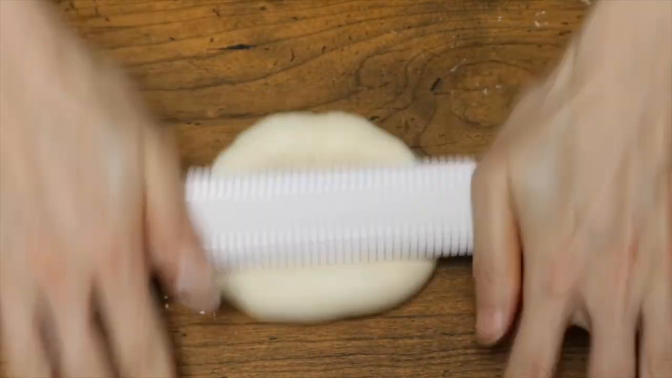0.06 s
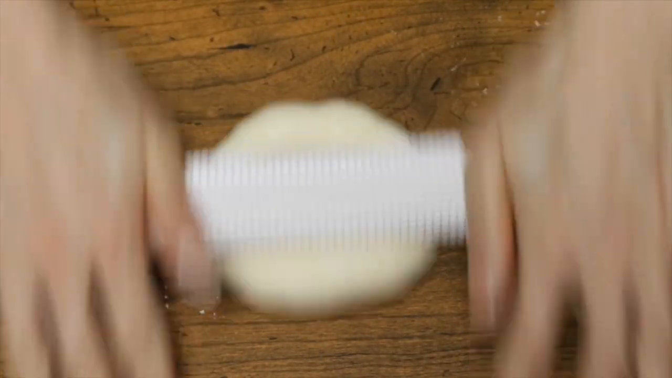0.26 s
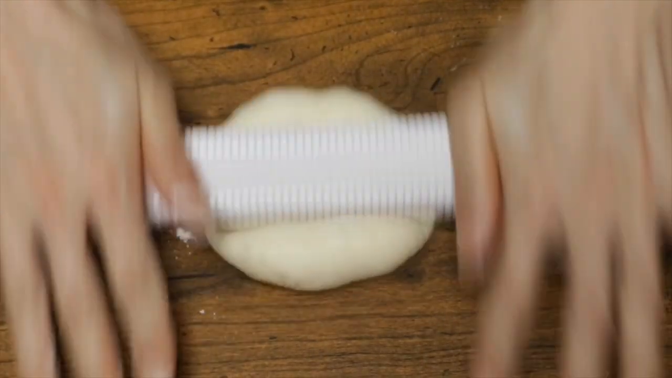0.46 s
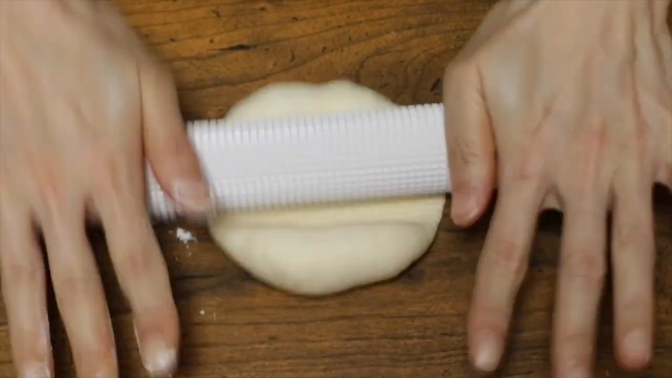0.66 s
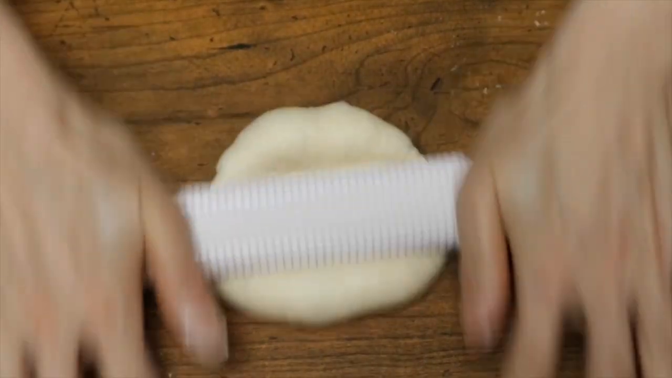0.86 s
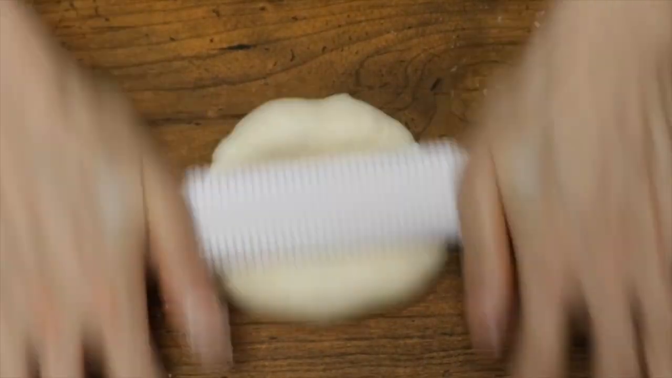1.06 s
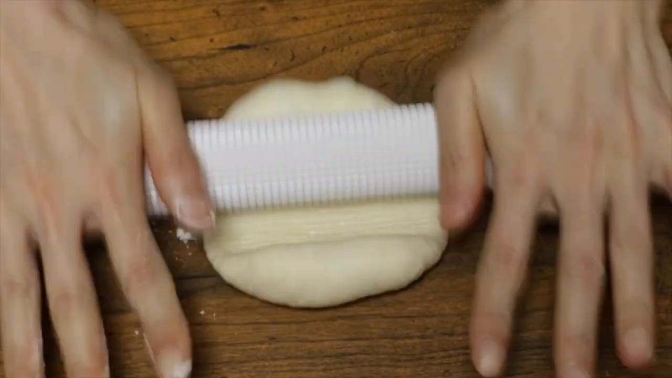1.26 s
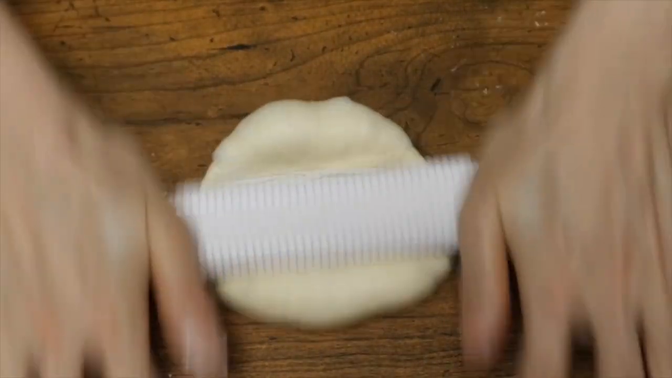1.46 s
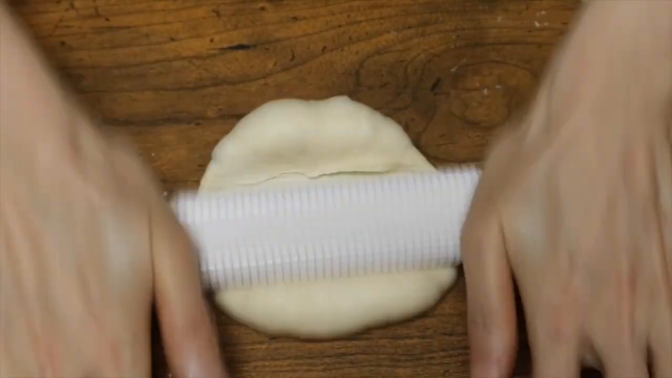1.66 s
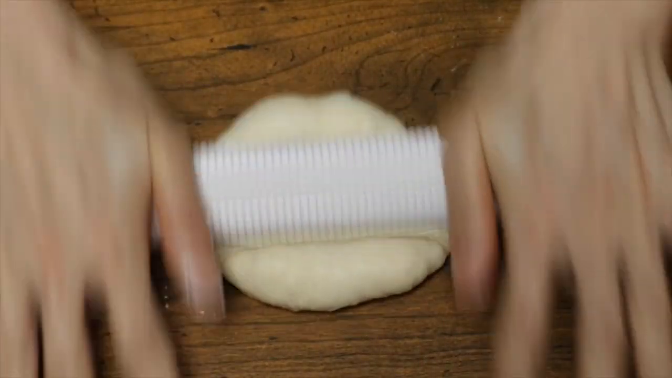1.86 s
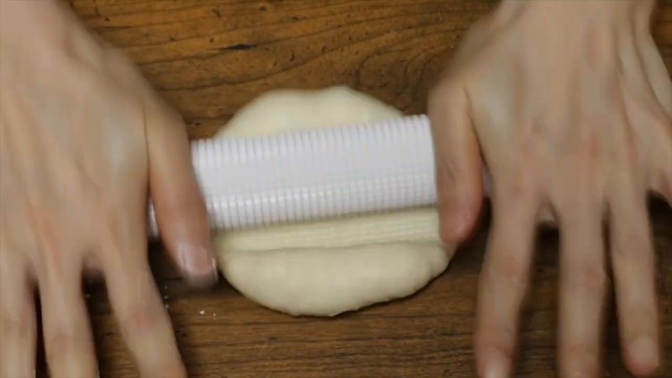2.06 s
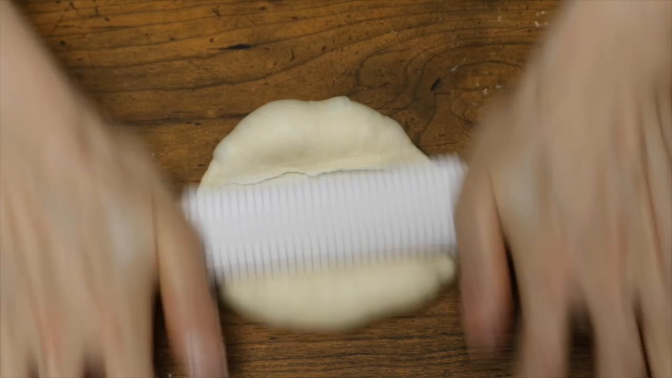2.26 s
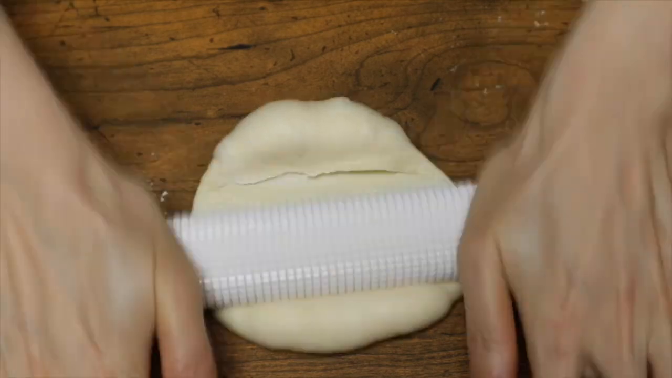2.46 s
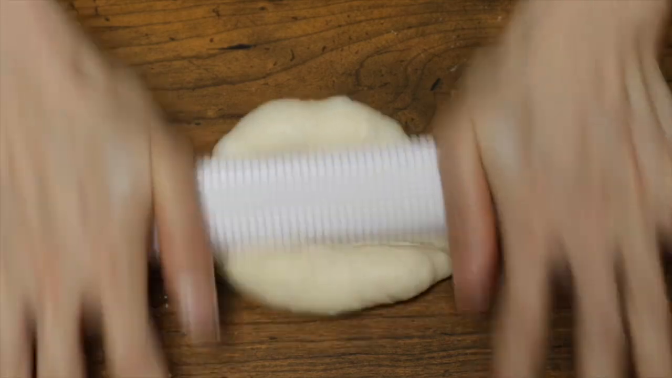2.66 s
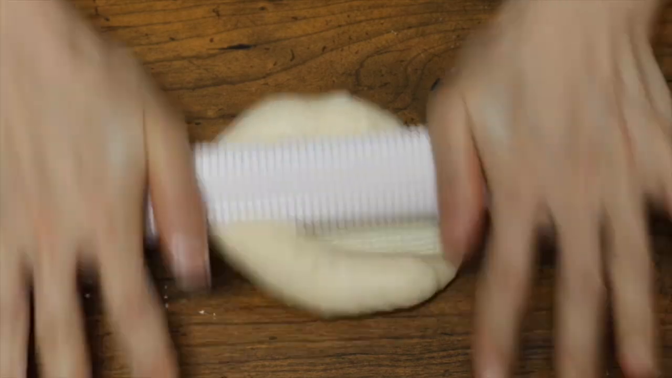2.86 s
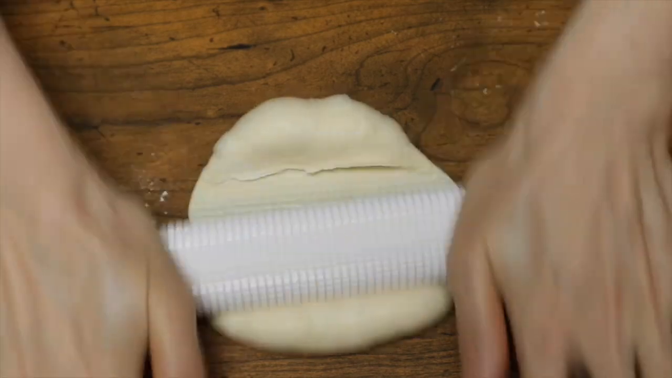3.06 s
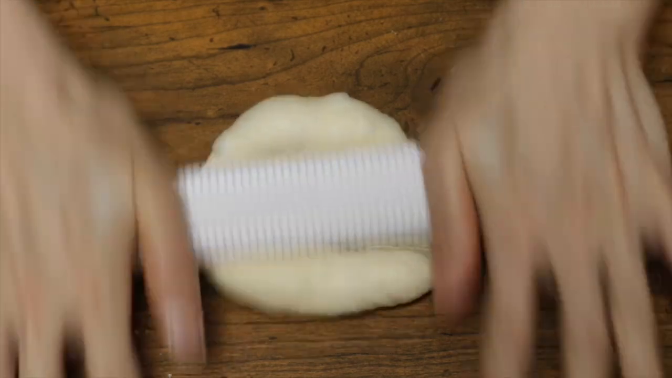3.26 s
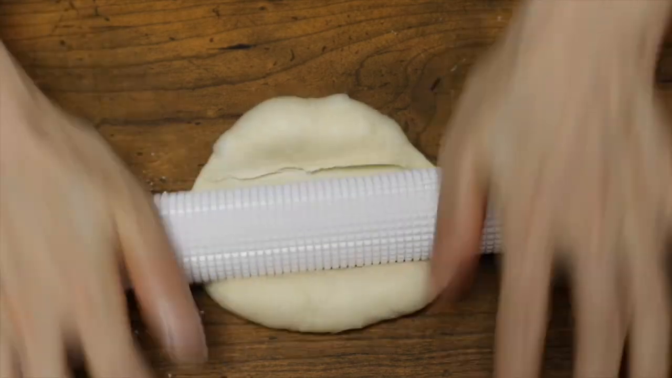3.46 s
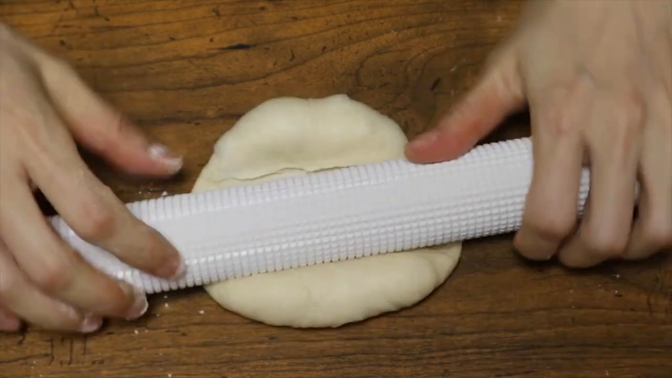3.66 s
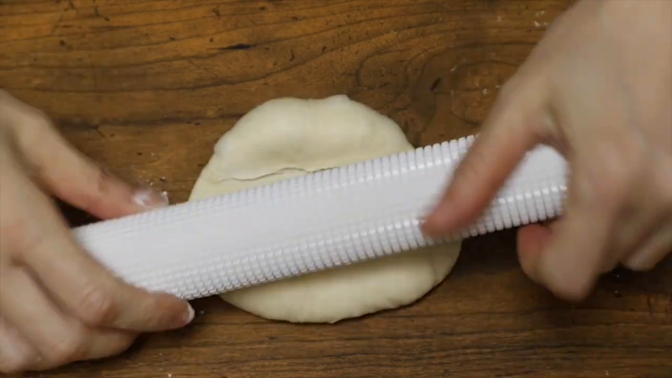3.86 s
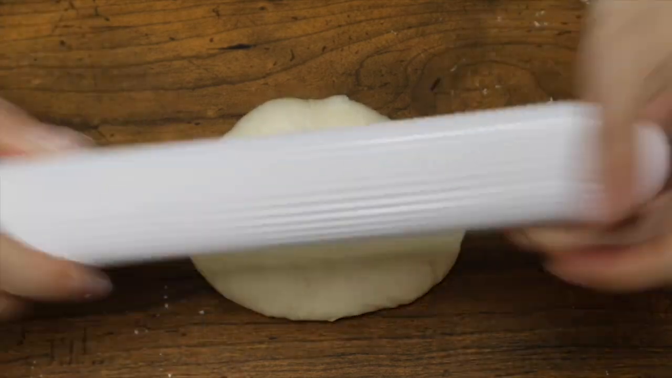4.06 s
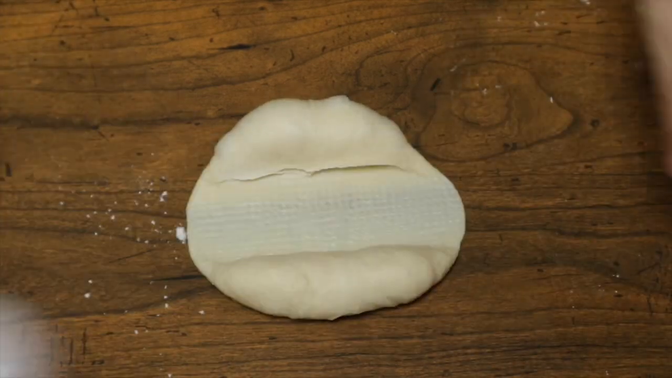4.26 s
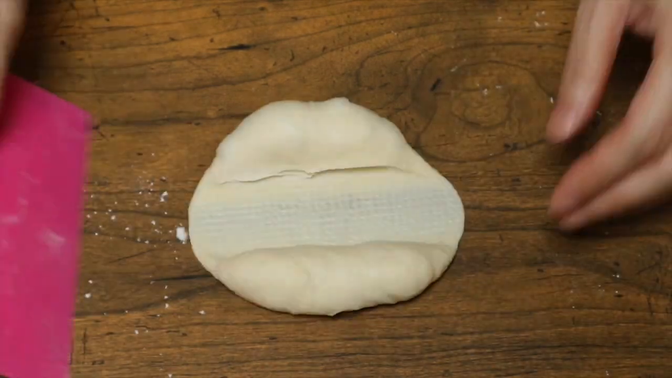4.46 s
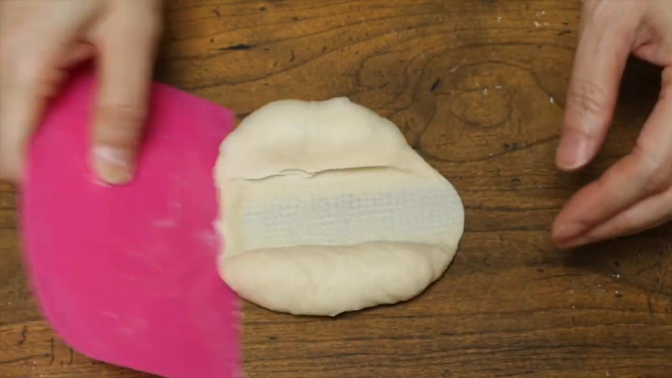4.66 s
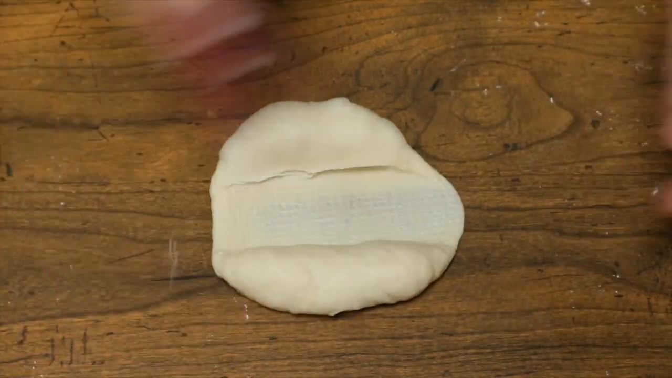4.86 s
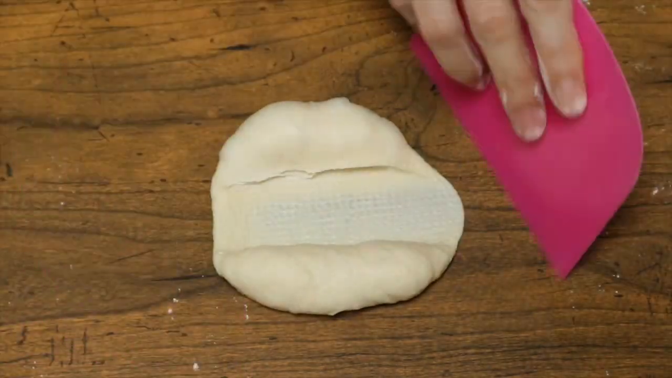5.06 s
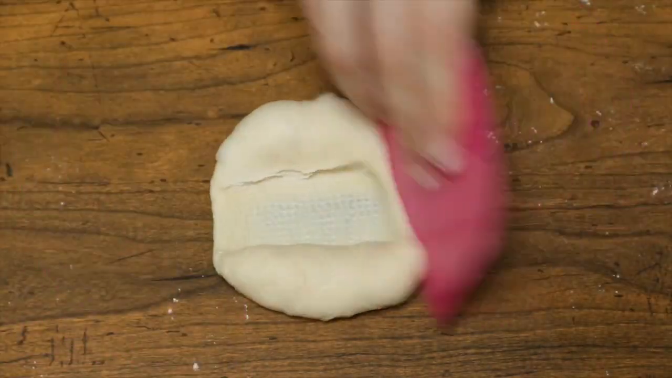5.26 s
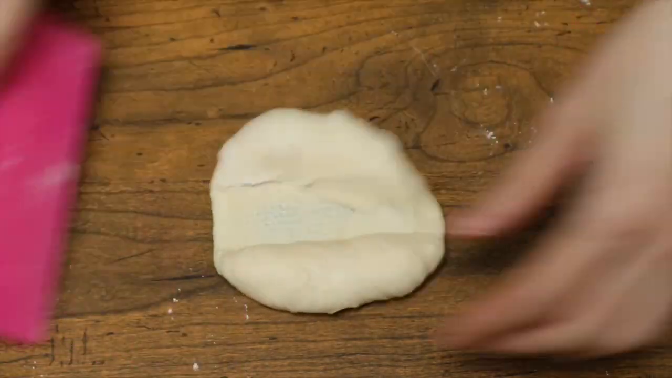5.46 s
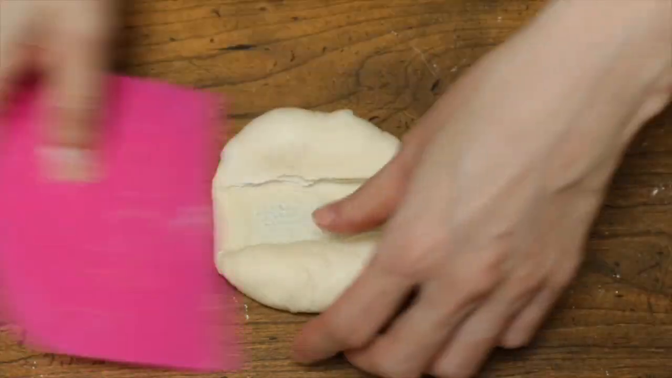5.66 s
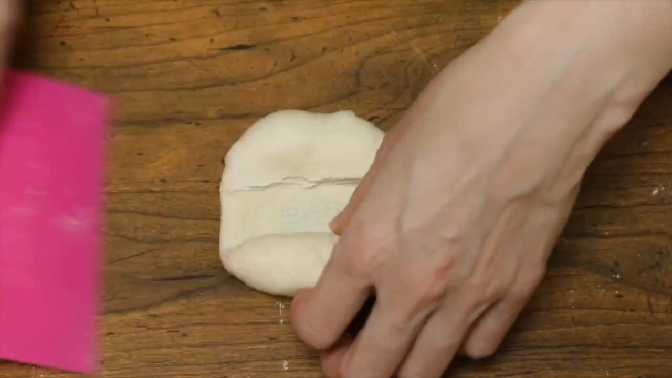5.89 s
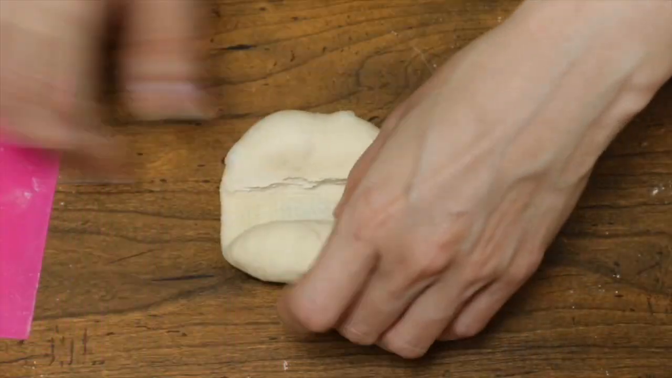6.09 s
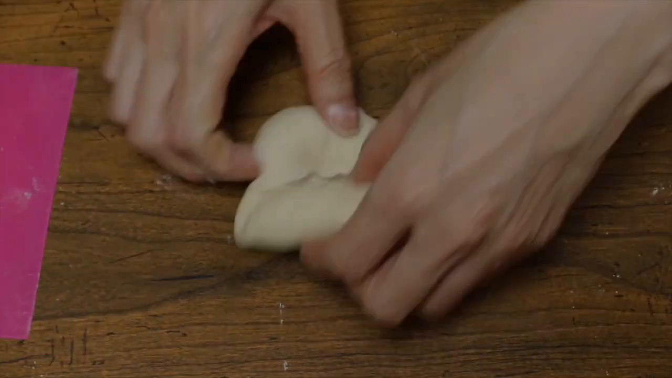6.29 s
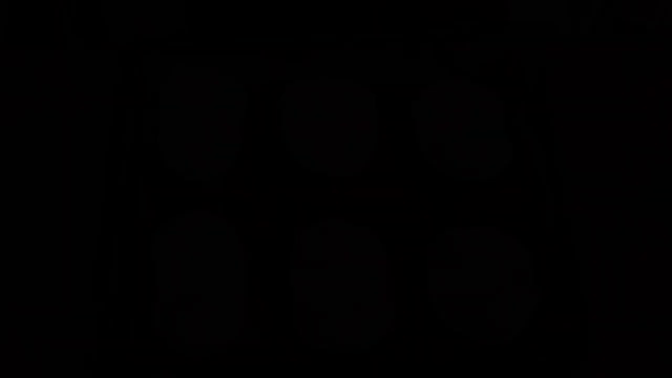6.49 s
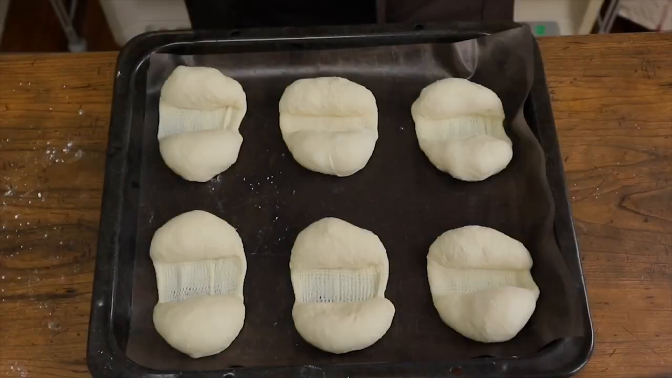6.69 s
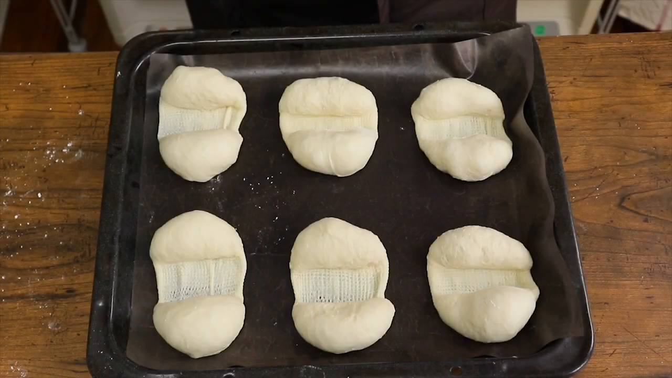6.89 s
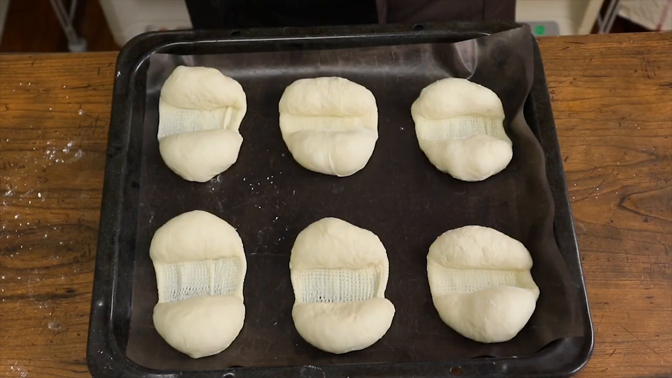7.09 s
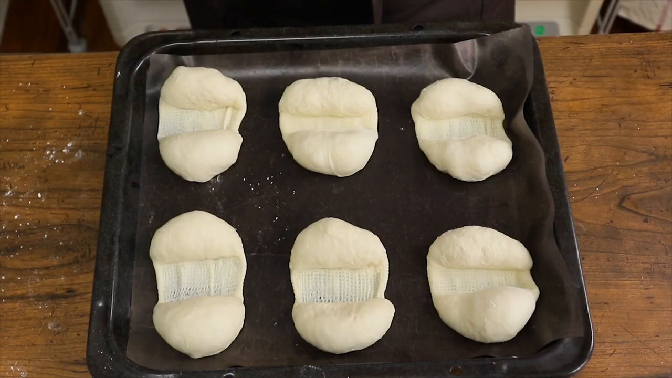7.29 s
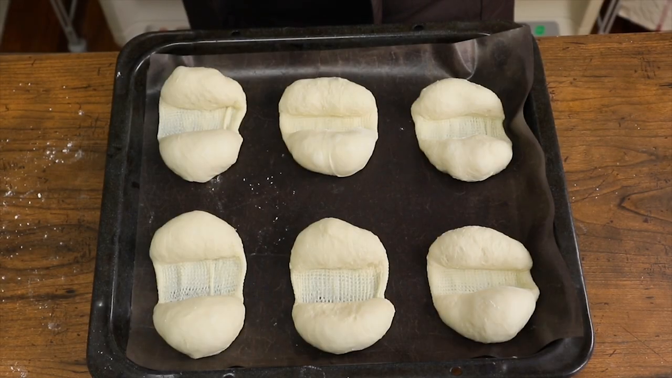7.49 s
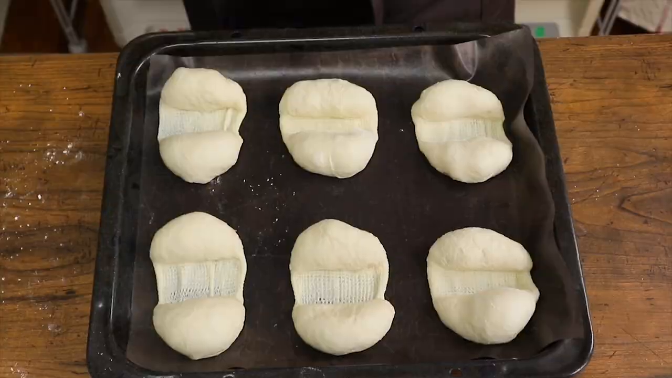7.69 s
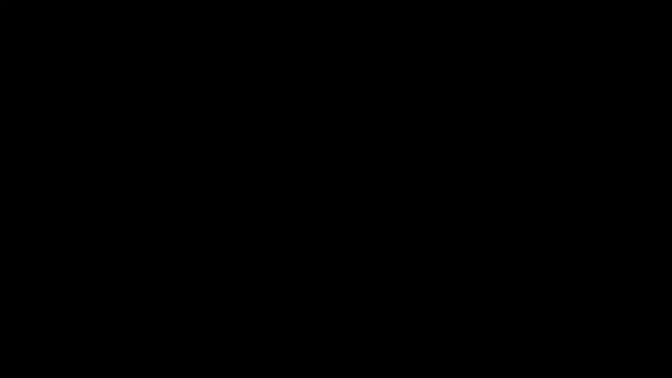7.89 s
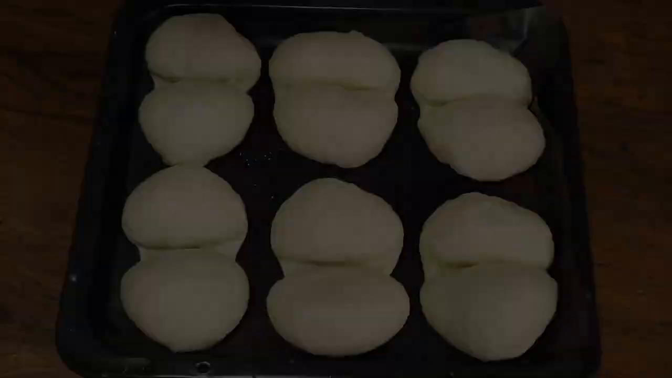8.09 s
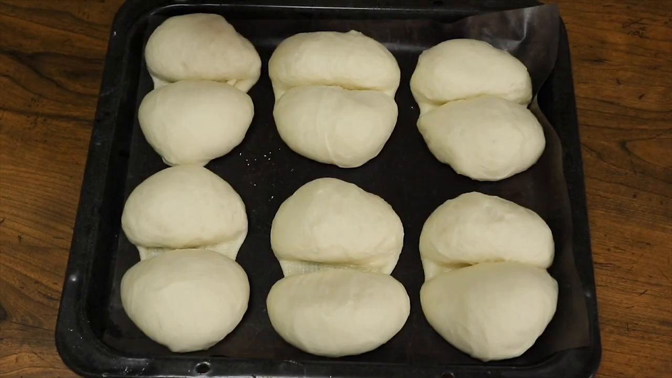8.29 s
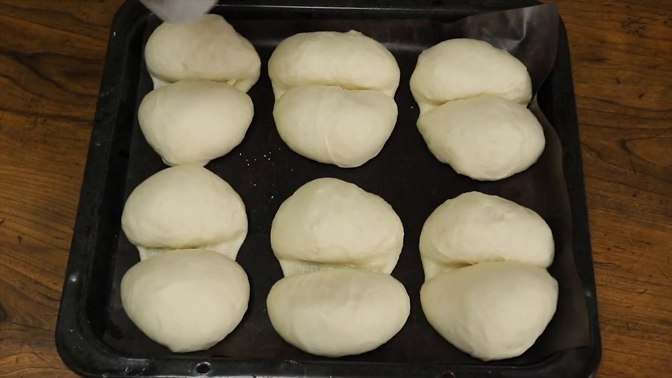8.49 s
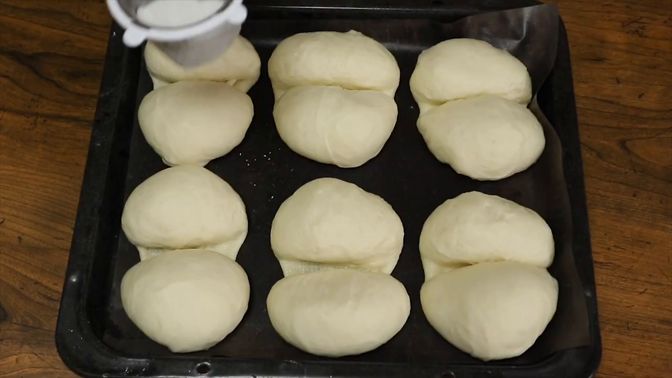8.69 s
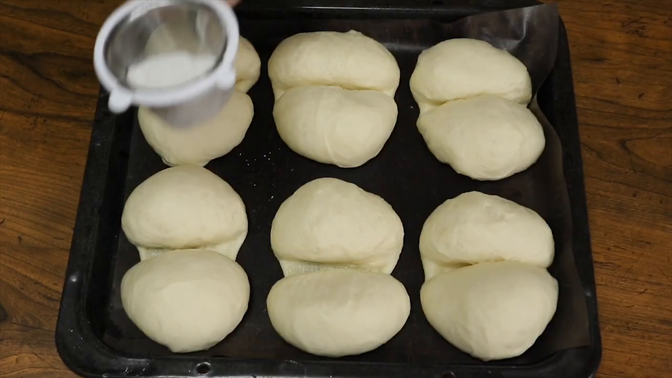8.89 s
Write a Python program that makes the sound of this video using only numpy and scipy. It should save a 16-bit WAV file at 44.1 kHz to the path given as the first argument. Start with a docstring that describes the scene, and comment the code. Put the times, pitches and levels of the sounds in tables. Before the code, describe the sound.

Close stereo microphones above a wooden table in a small, lightly echoing kitchen. From 0 to 3.3 s a hollow ridged plastic pin rolls rapidly back and forth, about eight strokes a second: faint at first, then stronger fluttering skin rustle, short ridge rattles, dry creaks and small climbing squeaks, with dull yielding dough beneath. Light hollow bumps at 3.4-3.5 s; a short rattle at 3.66 and laying down around 3.8. Room air rises at 4.5 s as a scraper taps dully and hisses over floury wood. A hard bright clack at 5.1 is the loudest event; gritty, pitch-bending slides follow at 5.2 and 5.7, then taps around 6.0 and a soft dough flop with dragging at 6.2. From 6.55 to 7.8 baking paper crackles, slides and snaps irregularly. A silent gap, then from 8.07 only faint room tone and low hum.

```python
"""A small kitchen, close to a wooden table where buns are shaped, in four passages with short fades.
A ridged plastic pin rolls to and fro under the palms: knocks and slips excite its ridges, hollow wall and dough.
A plastic scraper raps the table (struck modes) and slides over floury wood (grains through resonances).
Baking paper rustles in a tray as crackling grains and snapping creases; then only room tone and a low hum."""
import sys
import numpy as np
from scipy import signal
from scipy.fft import rfft, irfft, next_fast_len
from scipy.io import wavfile
from scipy.ndimage import uniform_filter1d

SR = 44100
rng = np.random.default_rng(int(sys.argv[2]) if len(sys.argv) > 2 else 0)


def wav_out(sig):
    """Save sig, one row per channel (or a flat mono array), as 16-bit PCM at SR to the path in sys.argv[1]."""
    wavfile.write(sys.argv[1], SR, np.round(np.clip(np.atleast_2d(sig).T, -1, 1) * 32767).astype(np.int16))


N = 394254

# pin pushed away: t/s, ridge knock level/dB, delay until the palms slip/s, palm grip level/dB
PUSHES = [(.215, -71, 0.011, 0), (0.441, -59, 0.013, 1), (.668, -53, 0.018, -2.5), (.975, -61, 0.0065, 2),
          (1.28, -71, 0.014, -0.5), (1.569, -67, 0.0093, -0.5), (1.828, -52.5, 0.0043, 0),
          (2.0813, -37, 0.013, -1.5), (2.339, -40, 0.028, 0), (2.602, -39, 0.03, -1),
          (2.8986, -35, 0.0019, 1.5), (3.177, -42, 0.022, -3)]
# pin drawn back: t/s, run of ridges/s, ridges per s, knock level/dB, squeak level/dB,
# delay of the loudest squeak/s, first f/Hz
PULLS = [(0.087, 0.034, 88, -76, -76, .01, 2400), (.3, 0.04, 103, -52, -57, 0.03, 2380),
         (.522, 0.042, 92, -47.5, -76, .01, 2400), (.755, 0.038, 90, -51.5, -79, .01, 2400),
         (1.108, 0.016, 99, -60, -46, 0.0034, 2600), (1.414, 0.036, 107, -73, -54, 0.00096, 2667),
         (1.6778, 0.03, 95, -76, -44.5, 0.00094, 2500), (1.9342, 0.05, 102, -61, -46.5, 0.017, 2427),
         (2.188, 0.05, 103, -39, -45, 0.017, 2360), (2.461, 0.023, 104, -45, -49.5, 0.0061, 2400),
         (2.729, 0.03, 96, -38.5, -45, 0.0049, 2640), (3.0049, 0.039, 119, -44.5, -43, 0.0065, 2280),
         (3.3158, 0.043, 83, -60, -46, 0.00098, 2399)]
# thin wall of the hollow pin: f/Hz, relative level/dB
WALL_MODES = [(2000, 1), (2430, -18), (2670, -1), (2950, -5), (3500, -2)]
# tone of skin on ridges: f/Hz, relative level/dB per Hz
SKIN_HISS = [(100, 9.5), (500, -1.5), (1500, 9.5), (3000, 0.5), (4500, 2.5), (7000, 0.5), (10500, 5),
             (12500, -5), (15000, -78)]
EFFORT_DB_PER_S, FULL_EFFORT_AT_S = 9.5, 3.07  # the limit holds for pushes only
PUSH_HISS_DB, PUSH_HOLLOW_DB = -77, -76.5  # at the outset
PULL_HISS_DB, PULL_HOLLOW_DB = -75.5, -72  # hiss at the outset; hollow level the same at every pull
PUSH_HOLLOW_FOLLOWS, PULL_HISS_FOLLOWS, PUSH_SHORTENS = 0.85, 0.31, 0.52  # shares of the effort in dB
PUSH_HALF_S, PULL_HALF_S = 0.045, 0.04  # half lengths; the push at the outset
PULL_SLIP_S = 0.033  # delay until the palms slip


def palms():
    """Skin brushes the ridges at every stroke and sets the hollow pin rustling."""
    hiss, hollow = [], []
    for s, _, slip_s, grip_db in PUSHES:
        effort_db = EFFORT_DB_PER_S * min(s, FULL_EFFORT_AT_S)
        half = PUSH_HALF_S * from_db(-PUSH_SHORTENS * effort_db)
        hiss.append((s + slip_s, half, PUSH_HISS_DB + effort_db + grip_db))
        hollow_db = PUSH_HOLLOW_DB + PUSH_HOLLOW_FOLLOWS * effort_db + grip_db
        hollow.append((s + slip_s, half, hollow_db))
    for s, *_ in PULLS:
        hiss_db = PULL_HISS_DB + PULL_HISS_FOLLOWS * EFFORT_DB_PER_S * s
        hiss.append((s + PULL_SLIP_S, PULL_HALF_S, hiss_db))
        hollow.append((s + PULL_SLIP_S, PULL_HALF_S, PULL_HOLLOW_DB))
    # the skin flicks off one ridge after another, so the rustle flutters
    ridge_phase = 2 * np.pi * np.cumsum(88 + 9 * drift(6.7)) / SR
    flutter = rms_one(from_db(5 * np.cos(ridge_phase)))
    slips = flutter * grains(per_s=5800, spread_db=3.5)
    wall = rms_one(sum(from_db(db) * resonate(slips, hz, width_hz=280) for hz, db in WALL_MODES))
    skin = colour(flutter * grains(per_s=9000, spread_db=1.5), SKIN_HISS)
    return swells(hiss) * skin + swells(hollow) * wall


# pin pressed on the table: f/Hz, relative level/dB, t60/s
PIN_MODES = [(198, -8, 0.04), (342, 3, 0.037), (610, 8.5, 0.011), (766, -2, 0.029), (1150, -22, 0.0099),
             (1550, 1, 0.012), (2150, -9, 0.0092)]
# one more rattle as the pin is lifted: t/s, ridges per s, run/s, knock level/dB,
# creak level/dB (before CREAK_LIFT_DB)
LIFT = (3.6645, 110, .018, -43, -57)
PUSH_RIDGES_PER_S, PUSH_RUN_S, PUSH_CREAK_BELOW_DB = 112, 0.036, 22  # creak before CREAK_LIFT_DB
CREAK_HZ, CREAK_CLIMB_HZ, CREAK_LIFT_DB = 2250, 520, 6
SQUEAK_FADE_DB = 19  # over one run length away from the loudest squeak
RASP_BELOW_DB, TICK_BELOW_DB, RIDGE_TICK_HZ = 6, 9.5, 10050


def ridges():
    """Ridges tip over one by one, knocking the table: dry creaks when pushed, climbing squeaks when drawn back."""
    # run: start, ridges per s, length, knock dB, creak or squeak dB, loudest delay, first pitch
    runs = [(s, PUSH_RIDGES_PER_S, PUSH_RUN_S, db, db - PUSH_CREAK_BELOW_DB, None, CREAK_HZ)
            for s, db, *_ in PUSHES]
    runs.append((*LIFT, None, CREAK_HZ))
    runs += [(s, per_s, length, *rest) for s, length, per_s, *rest in PULLS]
    knocks, creaks, squeaks = [], [], []
    for first, per_s, length, knock_db, creak_db, loudest_s, first_hz in runs:
        chance = rng.uniform(-1, 1, (16, 3)) * [.001, 1.5, 2]  # timing s, knock dB, creak dB
        for k, delay in enumerate(np.arange(0, length, 1 / per_s)):
            s = first + delay + chance[k, 0]
            progress = delay / length
            hz = first_hz + CREAK_CLIMB_HZ * np.sqrt(progress)
            off_peak = (progress - .3) ** 2  # strongest a third of the way in
            knocks.append((s, knock_db - 10 * off_peak + chance[k, 1], 3000))
            if loudest_s is None:
                creaks.append((s, creak_db - 14 * off_peak + CREAK_LIFT_DB + chance[k, 2], hz))
            else:
                fade_db = SQUEAK_FADE_DB * abs(delay - loudest_s) / length
                squeaks.append((s, creak_db - fade_db + chance[k, 2], hz))
    creaks += [(s, db - RASP_BELOW_DB, hz) for s, db, hz in squeaks]
    ticks = [(s, db - TICK_BELOW_DB, RIDGE_TICK_HZ) for s, db, _ in squeaks]
    return (strike(knocks, PIN_MODES, crack_db=-8.0)
            + snap(creaks, decay_s=0.0043, breadth=0.49)
            + squeak(squeaks, length_s=.0011, glide=0.13, rough=.65)
            + snap(ticks, decay_s=0.0012, breadth=0.63, order=4))


# how loudly the dough yields: swelling at first, faint at 1.2 s, then growing again: t/s, level/dB
KNEAD = [(0, -75), (.45, -60), (.75, -57.5), (1.0, -57.5), (1.2, -77), (3.3, -62.5)]
# dull tone of soft handling, for dough and paper: f/Hz, relative level/dB per Hz
HANDLING = [(25, -37), (70, -7.5), (140, -6), (300, -11), (600, -17.5), (1500, -32), (5000, -64)]
KNEAD_HALF_S, KNEAD_DELAY_S = 0.038, 0.018


def dough():
    """Soft dough gives way under every stroke in many small, dull slips."""
    knead_db = np.interp(clock(), *np.transpose(KNEAD))
    pressed = swells([(s + KNEAD_DELAY_S, KNEAD_HALF_S, 0) for s, *_ in PUSHES + PULLS])
    slips = grains(per_s=600, spread_db=1.5)
    return from_db(knead_db) * pressed * colour(slips, HANDLING)


# fingers brush plastic as a tool changes hands: t/s, half length/s, level/dB
BRUSHES = [(4.31, 0.048, -76.5), (5.447, 0.044, -57.5)]


def fingers():
    """Fingertips rub over plastic in one narrow, grainy band."""
    band = grains(per_s=3100, spread_db=-1.0)
    for _ in range(2):
        band = resonate(band, hz=2500, width_hz=820)
    return swells(BRUSHES) * rms_one(band)


# pin bumps the table, is laid down and rocks to rest: t/s, level/dB, contact hardness f/Hz
PIN_DROPS = [(3.4148, -45.5, 803), (3.4968, -48.5, 700), (3.7811, -38.5, 900), (3.799, -58, 600),
             (3.806, -52, 706), (3.8185, -44.5, 450), (3.8405, -49, 250), (3.8615, -66, 500)]
# whole hollow pin ringing freely: f/Hz, relative level/dB, t60/s
PIN_BODY = [(226, 2.5, 0.054), (300, -7, 0.023), (358, 2, 0.074), (458, -3, 0.048), (624, -5, 0.078),
            (900, 2, 0.024)]


def pin_drops():
    """The freed pin rings as a hollow body at each bump."""
    return strike(PIN_DROPS, PIN_BODY, crack_db=-9.0)


# scraper blows on the table: t/s, level/dB, contact hardness f/Hz
TABLE_KNOCKS = [(5.0973, -25.5, 2500), (5.1038, -14.5, 2050), (6.024, -34.5, 700)]
# wooden table: f/Hz, relative level/dB, t60/s
TABLE_MODES = [(82, -23.5, .12), (127.2, -20, 0.073), (173.4, -19, 0.16), (279, -10.5, 0.035),
               (392, -11.5, 0.045), (503, -5, 0.021), (616.3, -13, 0.093), (715, -13.5, 0.08),
               (820, -14, 0.07), (960, -11.5, 0.069), (1150, -11, 0.03), (1580, -3.5, 0.037),
               (2080, -0.5, 0.026)]


def table_knocks():
    """The scraper's blows ring the modes of the table top."""
    return strike(TABLE_KNOCKS, TABLE_MODES, crack_db=-9)


# scraper edge and fingernails tap the wood: t/s, level/dB, contact hardness f/Hz
SCRAPER_TAPS = [(3.7815, -49, 1000), (4.531, -29, 400), (4.545, -29, 300), (5.0958, -11.5, 6290),
                (5.1045, -22, 4000), (5.1125, -32, 900), (5.56, -35, 1200), (5.936, -39.5, 2000),
                (5.9745, -31.5, 1500), (5.994, -29.5, 700), (6.025, -23, 700), (6.087, -39, 4000),
                (6.2105, -36, 2980), (6.3205, -34.5, 1800)]
# scraper: f/Hz, relative level/dB, t60/s
SCRAPER_MODES = [(930, -14, .03), (1047, -12.5, 0.031), (1170, -10, 0.07), (1370, -13, 0.04),
                 (1565, -14, 0.07), (1720, -10, 0.045), (1800, -3.5, 0.0099), (2017, -17, 0.07),
                 (2207, -1, 0.012), (2430, -9, .025), (2660, -8, 0.025), (2940, -5.5, 0.014),
                 (3350, -8.5, 0.012), (3750, -14.5, .007)]


def scraper_taps():
    """Crack-rich taps ring the scraper's short modes."""
    return strike(SCRAPER_TAPS, SCRAPER_MODES, crack_db=-3.5)


# dough flops onto the table under the hand: t/s, level/dB, contact hardness f/Hz
FLOPS = [(6.2105, -26.5, 300), (6.2285, -32.5, 150), (6.243, -39, 150), (6.2565, -37, 200)]
# table damped by the dough: f/Hz, relative level/dB, t60/s
FLOP_MODES = [(123, -14, 0.056), (168, -5, 0.13), (233, -1.5, 0.035), (290, 1.5, 0.018), (400, -14, 0.06),
              (630, -22, 0.087)]


def flops():
    """Soft contacts favour the low modes of the damped table."""
    return strike(FLOPS, FLOP_MODES, crack_db=-11)


# plastic smacks the wood, first the pin, then the flat blade: t/s, peak level/dB, centre f/Hz
SMACKS = [(3.6645, -47, 1400), (3.6735, -45.5, 1250), (3.675, -52.5, 3200), (3.683, -50, 1290),
          (5.096, -16.5, 2440), (5.1045, -24.5, 2370), (5.9742, -38, 1800), (6.0245, -26, 1400)]


def smacks():
    """Flat plastic slaps wood in short, banded noise bursts."""
    return snap(SMACKS, decay_s=0.0032, breadth=0.85, order=3)


# blade slides over floury wood: t/s, hold/s, rise/s, fall/s, hiss level/dB, resonances level/dB,
# bending tone level/dB, its first f/Hz, its last f/Hz
SCRAPES = [(4.546, 0.15, 0.024, 0.14, -47, -50.5, -66, 1150, 1210),
           (5.19, 0.089, 0.15, 0.024, -45.5, -45.5, -49, 2150, 2700),
           (5.663, 0.091, 0.072, 0.07, -46.5, -44, -47.5, 2500, 2970),
           (5.971, 0.052, 0.019, 0.085, -47, -52.5, -52, 1810, 1690)]
# sliding blade: f/Hz, width f/Hz, relative level/dB
BLADE = [(1230, 790, -2), (1310, 100, 6), (1510, 110, 1), (1800, 100, 4.5), (2030, 110, 2.5),
         (2420, 1700, 2.5), (3280, 190, 0.5)]
# tone of floury wood: f/Hz, relative level/dB per Hz
WOOD_HISS = [(60, -8), (150, -6), (500, 3.5), (1000, 1), (3500, 4), (4800, -0.5), (7000, -1), (10300, 3.5),
             (12500, -4.5), (15000, -27)]
# dough dragged over the wood: t/s, hold/s, rise/s, fall/s
DRAG = (6.21, 0.22, 0.02, .03)
DRAG_DB = -66.5
CHATTER_DB, CHATTER_PER_S = 6.5, 240  # the blade catches and slips unevenly
CRUMBS_PER_S, CRUMBS_DB = 440, -9  # coarse grains among the flour, relative to it
EDGE_SPREAD_DB = -4.5  # separate hiss that the long edge sends each microphone


def scrape():
    """Flour and crumbs excite the blade and a tone gliding as it bends. Returns the blade and its wide edge hiss."""
    flour = from_db(CHATTER_DB * drift(CHATTER_PER_S)) * grains(per_s=4000, spread_db=3.0)
    crumbs = grains(CRUMBS_PER_S, spread_db=2.5)
    slips = rms_one(rms_one(flour) + from_db(CRUMBS_DB) * crumbs)
    blade = 0
    for k, (hz, width_hz, db) in enumerate(BLADE):
        blade = blade + (-1) ** k * from_db(db) * resonate(slips, hz, width_hz)
    blade = rms_one(blade)
    bend_points = []
    for s, hold, *_, first_hz, last_hz in SCRAPES:
        bend_points += [(s, first_hz), (s + hold, last_hz)]
    bend_hz = np.interp(clock(), *np.transpose(bend_points))
    bend = gliding_resonance(slips, bend_hz, width_hz=300)
    # one hiss shared by both sides, then one for each
    hiss = colour(np.array([grains(per_s=13000, spread_db=1.5) for _ in range(3)]), WOOD_HISS)
    body, hiss_level = 0, from_db(DRAG_DB) * held(*DRAG)
    for s, hold, rise, fall, hiss_db, blade_db, bend_db, *_ in SCRAPES:
        stroke = held(s, hold, rise, fall)
        body = body + stroke * (from_db(blade_db) * blade + from_db(bend_db) * bend)
        hiss_level = hiss_level + stroke * from_db(hiss_db)
    pressure = from_db(2.3 * drift(45))
    edge = from_db(EDGE_SPREAD_DB) * pressure * hiss_level * hiss[1:]
    return pressure * (body + hiss_level * hiss[0]), edge


# tone of crackling paper: f/Hz, relative level/dB per Hz
PAPER_HISS = [(300, 10), (1000, 5.5), (2000, 13.5), (3500, 5), (7300, 9), (10000, -5), (12500, -30),
              (14500, -41)]


def rustle():
    """Folds of many sizes crackle, each size at its own pitch and in clumps of its own."""
    folds = 0
    for hz in np.geomspace(800, 10000, 8):
        clumps = from_db(4 * drift(130))
        folds = folds + resonate(clumps * grains(per_s=1800, spread_db=3.5), hz, hz / 2)
    return from_db(2.7 * drift(90)) * colour(folds, PAPER_HISS)


TICKS_PER_S, TICK_DB, TICK_SPREAD_DB, TICK_HZ = 12, -53, 3, 3200


def small_folds():
    """Small folds tick at random through the tray passage: (t/s, peak level/dB, centre f/Hz)."""
    start, end, _ = PASSAGES[2]
    ticks = []
    for when, size, pitch in rng.random((int(TICKS_PER_S * (end - start)), 3)):
        db = TICK_DB + TICK_SPREAD_DB * (2 * size - 1)
        ticks.append((start + when * (end - start), db, TICK_HZ * 2 ** (pitch - .5)))
    return ticks


# paper shifted in short moves: t/s, hold/s, crackle level/dB, slide level/dB, soft handling level/dB
PAPER_MOVES = [(6.622, 0.053, -59, -52.5, -48), (6.778, .16, -54, -57.5, -53),
               (7.094, 0.034, -59, -57.5, -63), (7.16, 0.033, -53, -56.5, -54),
               (7.355, 0.12, -68, -56.5, -62.5), (7.509, 0.024, -64, -64, -61),
               (7.608, 0.039, -62, -65, -60.5), (7.778, .04, -63, -64.5, -62)]
# floor between the moves: crackle level/dB, slide level/dB, soft handling level/dB
PAPER_STIR_DB = (-92, -71, -76)
# tone of the sliding sheet: f/Hz, relative level/dB per Hz
PAPER_SLIDE = [(200, -6.5), (450, 3), (800, 5), (1150, 6), (1800, -6), (3000, -12.5), (8000, -41)]
# loudest creases snapping: t/s, peak level/dB, centre f/Hz
CREASES = [(6.5722, -43.5, 1300), (6.6304, -33.5, 2700), (6.6374, -39.5, 2000), (6.6564, -36.5, 1500),
           (6.6605, -42, 1900), (6.6792, -36, 3280), (6.6923, -35, 5130), (6.7023, -44, 1800),
           (6.7741, -35, 4660), (6.7863, -39, 4640), (6.7928, -36, 5040), (6.8229, -46, 2100),
           (6.8308, -34, 4730), (6.8513, -36, 2800), (6.8759, -42, 2600), (6.9269, -53, 2100),
           (6.9475, -33.5, 1220), (6.9505, -53, 1500), (6.9965, -51.5, 2500), (7.1002, -39.5, 2340),
           (7.1352, -39, 2600), (7.1604, -37, 2600), (7.1681, -39, 3100), (7.1784, -38, 3200),
           (7.1888, -41, 2100), (7.2254, -31.5, 3430), (7.2741, -49, 3650), (7.2963, -46, 2130),
           (7.4215, -39, 1170), (7.424, -40, 1290), (7.4414, -46, 1700), (7.4534, -41.5, 1700),
           (7.5068, -43.5, 2900), (7.5297, -40, 3700), (7.5416, -49, 2900), (7.6643, -43, 3700),
           (7.7068, -52, 2400), (7.7286, -48, 2100), (7.7364, -49, 2620), (7.7549, -46, 1500)]
PAPER_RISE_S, PAPER_FALL_S, PAPER_TOP_HZ = 0.055, 0.045, 12000


def paper():
    """Each move brings clumps of crackle, the dull slide of the sheet and soft bumps; single creases snap."""
    levels = from_db(PAPER_STIR_DB)[:, None]
    for s, hold, *layers_db in PAPER_MOVES:
        move = held(s, hold, PAPER_RISE_S, PAPER_FALL_S)
        levels = np.maximum(levels, from_db(layers_db)[:, None] * move)
    slide = colour(grains(per_s=3000, spread_db=3), PAPER_SLIDE)
    bumps = colour(grains(per_s=780, spread_db=5.0), HANDLING)
    creases = snap(CREASES + small_folds(), decay_s=.0019, breadth=.75, order=1)
    sheet = np.sum(levels * [rustle(), slide, bumps], axis=0) + creases
    top_cut = signal.butter(8, PAPER_TOP_HZ, fs=SR, output="sos")
    return signal.sosfilt(top_cut, sheet) * passage_gate(PASSAGES[2])


# appliance humming in the last passage: f/Hz, level/dB
HUM = [(48.4, -66), (129.2, -80), (199.2, -73), (290.7, -74), (441.4, -80.5), (489.9, -82), (586.8, -81)]


def appliance_hum():
    """Low partials waver slightly in level and phase."""
    hum = 0
    for hz, db in HUM:
        wavering_s = clock() + 0.00048 * drift(10)
        hum = hum + from_db(db + drift(32)) * np.sqrt(2) * np.sin(2 * np.pi * hz * wavering_s)
    return hum * passage_gate(PASSAGES[3])


# passages: start t/s, end t/s, room tone level/dB
PASSAGES = [(-.1, 4.517, -62), (4.523, 6.562, -52), (6.546, 7.79, -62), (8.066, 9.69, -64.5)]
# tone of the room: f/Hz, relative level/dB per Hz
ROOM_TONE = [(25, -12.5), (60, -3.5), (95, -3.5), (128, 7), (170, 2), (400, -2), (1000, -7.5),
             (2500, -12.5), (5000, -20.5), (10000, -27.5), (12000, -32.5), (15000, -55)]
# room tone: f/Hz, left-right correlation (-1 to 1)
TONE_LIKENESS = [(60, 0.85), (130, 1), (290, 0.43), (640, 0.17), (1400, -0.15), (3100, -0.51),
                 (7000, -0.54)]


def room_tone():
    """Steady diffuse air noise, its level set for each passage."""
    level = sum(from_db(passage[2]) * passage_gate(passage) for passage in PASSAGES)
    return level * colour(diffuse(TONE_LIKENESS, N), ROOM_TONE)


# echo: f/Hz, left-right correlation (-1 to 1)
ECHO_LIKENESS = [(100, 1), (400, 1), (1300, 0.94), (2500, 0.92), (4500, .05), (10000, 0.064)]
# kitchen decay: f/Hz, t60/s
KITCHEN_T60 = [(100, 0.072), (500, 0.34), (2000, 0.35), (5000, 0.5), (12000, 0.21)]


def kitchen_echo():
    """Diffuse reflections that set in after 3 ms and die band by band."""
    size = SR // 2
    t, hz = np.arange(size) / SR, np.fft.rfftfreq(size, 1 / SR)
    noise, out = rfft(diffuse(ECHO_LIKENESS, size)), 0
    for k, (_, t60) in enumerate(KITCHEN_T60):
        # each band crossfades into its neighbours
        share = at_hz([(row[0], j == k) for j, row in enumerate(KITCHEN_T60)], hz)
        out = out + irfft(noise * share, size) * np.exp(-np.log(1000) * t / t60)
    out = out * np.clip((t - .003) / 0.00083, 0, 1)
    return out / np.sqrt(np.sum(out ** 2) / 2)


def place(x, echo, wet_db, pan_db, lead_ms):
    """Direct sound, reaching the left microphone lead_ms earlier, plus the room."""
    size = next_fast_len(N, True)
    per_ms = np.fft.rfftfreq(size, 1000 / SR)
    late = irfft(rfft(x, size) * np.exp(-2j * np.pi * per_ms * lead_ms), size)[:N]
    direct = np.array([x * from_db(pan_db / 2), late * from_db(-pan_db / 2)])
    return direct + from_db(wet_db) * signal.fftconvolve(x[None], echo, axes=1)[:, :N]


def passage_gate(passage):
    """One during a passage, with 14 ms fades at its ends."""
    return np.clip(np.minimum(clock() - passage[0], passage[1] - clock()) / 0.014, 0, 1)


def strike(blows, modes, crack_db):
    """Each blow (s, dB, hardness Hz) cracks and rings the modes anew; a soft contact misses the high ones."""
    out, t = np.zeros(N), np.arange(SR // 4) / SR
    hz, level_db, t60 = np.transpose(modes)
    rings = np.sin(2 * np.pi * hz[:, None] * t) * np.exp(-np.log(1000) * t / t60[:, None])
    signs = (-1) ** (np.arange(len(hz)) // 2)
    span = signal.butter(2, [hz.min(), hz.max()], "band", fs=SR, output="sos")
    for s, db, hard_hz in blows:
        vary_db = rng.uniform(-3, 3, len(hz))
        body = (signs * from_db(level_db + vary_db) / (1 + (hz / hard_hz) ** 2)) @ rings
        soft = signal.butter(1, min(hard_hz, SR / 4), fs=SR, output="sos")
        burst = rng.standard_normal(len(t)) * np.exp(-t / 0.0019)
        crack = signal.sosfilt(np.vstack([span, span, soft]), burst + 1e-18)
        sound = rms_one(body) + from_db(crack_db) * rms_one(crack)
        sound = sound * (1 - np.exp(-t / 0.00046))  # soft onset
        out[int(s * SR):][:len(t)] += from_db(db) * sound / np.abs(sound).max()
    return out


def snap(snaps, decay_s, breadth, order=2):
    """Each snap (s, peak dB, centre Hz) is a noise burst in one broad resonance; order 1 leaves wide skirts."""
    out, t = np.zeros(N), np.arange(SR // 40) / SR
    for s, db, hz in snaps:
        burst = rng.standard_normal(len(t)) * np.exp(-t / decay_s)
        for _ in range(order):
            burst = resonate(burst, hz, breadth * hz)
        out[int(s * SR):][:len(t)] += from_db(db) * burst / np.abs(burst).max()
    return out


def squeak(squeaks, length_s, glide, rough):
    """Each squeak (s, peak dB, centre Hz) is a few ms of gliding, slightly rough tone."""
    out, t = np.zeros(N), np.arange(SR // 40) / SR
    envelope = (t / length_s) ** 2 * np.exp(2 - 2 * t / length_s)
    for s, db, hz in squeaks:
        jitter = uniform_filter1d(rng.standard_normal(len(t)), size=16)
        pitch = hz * (1 + glide * np.tanh(t / length_s - 1) + rough * jitter)
        tone = np.sin(2 * np.pi * np.cumsum(pitch) / SR)
        out[int(s * SR):][:len(t)] += from_db(db) * envelope * tone
    return out


def resonate(x, hz, width_hz):
    """One resonance, gain 1 at its top."""
    r = np.exp(-np.pi * width_hz / SR)
    zeros = np.array([1, 0, -1]) * (1 - r * r) / 2
    poles = [1, -2 * r * np.cos(2 * np.pi * hz / SR), r * r]
    return signal.lfilter(zeros, poles, x + 1e-18)


def gliding_resonance(x, hz, width_hz):
    """A resonance whose centre follows the curve hz; rms 1."""
    turn = np.exp(2j * np.pi * np.cumsum(hz) / SR)
    r = np.exp(-np.pi * width_hz / SR)
    # shift the centre to zero, smooth, shift back
    return rms_one((turn * signal.lfilter([1], [1, -r], x / turn + 1e-18)).real)


def grains(per_s, spread_db):
    """Tiny slips of uneven size at random moments; rms 1."""
    sizes = from_db(spread_db * np.minimum(rng.exponential(1, N), 4)) * rng.choice([-1, 1], N)
    return rms_one(sizes * (rng.random(N) < per_s / SR))


def colour(x, spectrum):
    """Causal (minimum-phase) filter with the given spectrum; rms 1."""
    size = next_fast_len((N + SR) // 2, True) * 2
    gain = from_db(at_hz(spectrum, np.fft.rfftfreq(size, 1 / SR)))
    cepstrum = irfft(np.log(gain))
    cepstrum[1:size // 2] *= 2
    cepstrum[size // 2 + 1:] = 0
    return rms_one(irfft(rfft(x, size) * np.exp(rfft(cepstrum)))[..., :N])


def diffuse(likeness, size):
    """White noise arriving from all sides at two close microphones."""
    alike = np.clip(at_hz(likeness, np.fft.rfftfreq(size, 1 / SR)), -.99, .99)
    mid, side = rfft(rng.standard_normal((2, size)))
    mid = np.sqrt((1 + alike) / 2) * mid
    side = np.sqrt((1 - alike) / 2) * side
    return irfft(mid + side * [[1], [-1]], size)


def swells(rows):
    """A smooth rise and fall for each (s, half length s, dB), 8 dB down at the half length."""
    t, out = clock(), np.zeros(N)
    for s, half, db in rows:
        near = np.abs(t - s) < half * 2 * np.pi
        out[near] += from_db(db) / np.cosh(np.pi / 2 * (t[near] - s) / half)
    return out


def held(start, hold_s, rise_s, fall_s):
    """Gain of one move: up by 20 dB in rise_s, full from the start for hold_s, down by 20 dB in fall_s."""
    t = clock()
    outside = np.maximum((start - t) / rise_s, (t - start - hold_s) / fall_s)
    return from_db(-20 * np.clip(outside, 0, 10))


def drift(rate):
    """Slow chance: random knots of spread 1, rate per second, joined by straight lines."""
    knots = rng.standard_normal(8192)
    return np.interp(clock() * rate, np.arange(len(knots)), knots)


def at_hz(points, hz):
    """Read a table on a log-frequency axis."""
    f, value = np.transpose(points)
    return np.interp(np.log(hz + 0.0012), np.log(f), value)  # the offset avoids log of zero


def from_db(db):
    """Decibels to gain."""
    return 10 ** (np.asarray(db) / 20)


def rms_one(x):
    """Scale to unit power."""
    return x / np.sqrt(np.mean(x ** 2) + 1e-20)


def clock():
    """Time of every sample in seconds."""
    return np.arange(N) / SR


def scene():
    """Everything happens on the table just below the microphones; the paper is nearer the right one."""
    echo = kitchen_echo()
    rolling = palms() + ridges() + dough() + fingers()
    pin = place(rolling, echo, wet_db=-4.5, pan_db=-0.5, lead_ms=0.016)
    blows = table_knocks() + pin_drops() + scraper_taps() + flops() + smacks()
    knocks = place(blows, echo, wet_db=-4.5, pan_db=0.0, lead_ms=0.011)
    sliding, edge = scrape()
    blade = place(sliding, echo, wet_db=-4.0, pan_db=0.2, lead_ms=0.028) + edge
    sheet = place(paper(), echo, wet_db=-36.0, pan_db=-5.5, lead_ms=-0.059)
    gate = sum(passage_gate(passage) for passage in PASSAGES)
    return (pin + knocks + blade + sheet) * gate + room_tone() + appliance_hum()


def record(dry):
    """The top is cut steeply at 15 kHz."""
    return signal.sosfilt(signal.ellip(10, .1, 80, 15000, fs=SR, output="sos"), dry)


dry = scene()
out = record(dry)
wav_out(out)
```